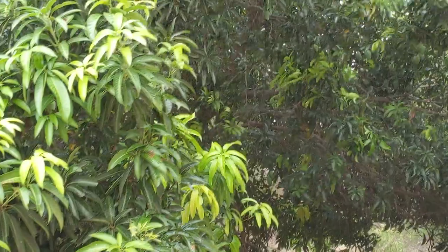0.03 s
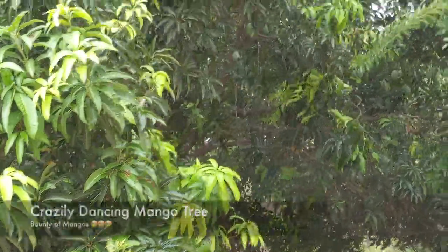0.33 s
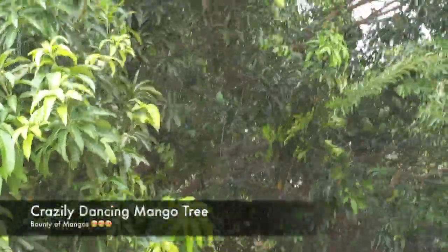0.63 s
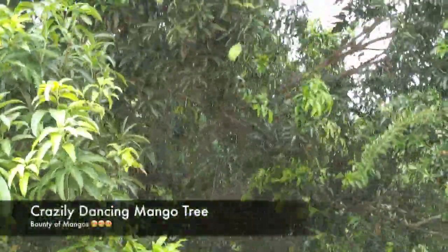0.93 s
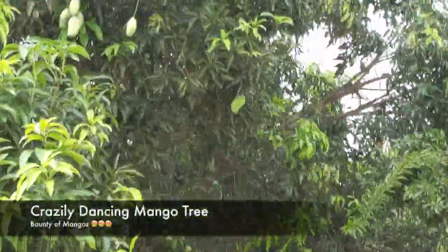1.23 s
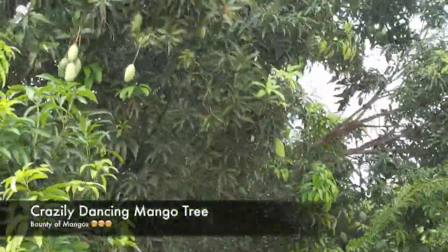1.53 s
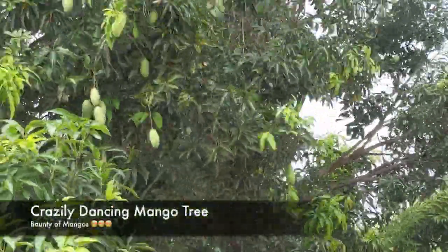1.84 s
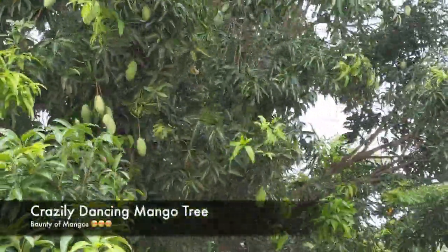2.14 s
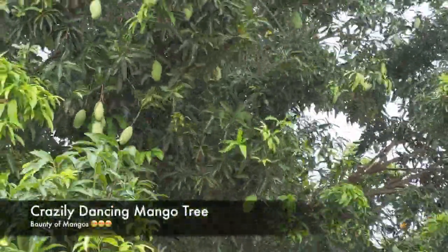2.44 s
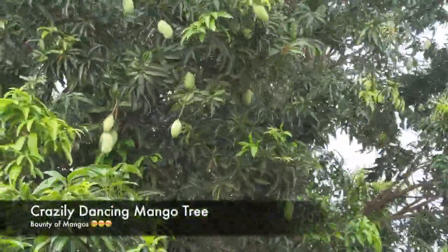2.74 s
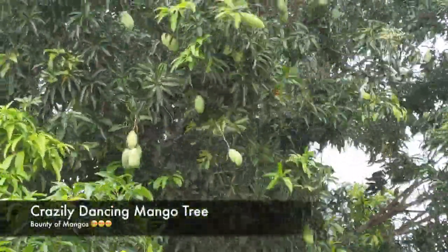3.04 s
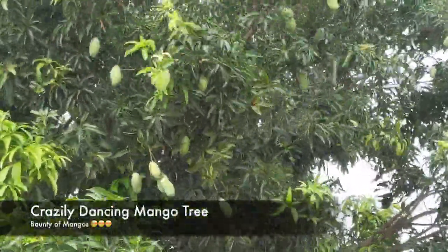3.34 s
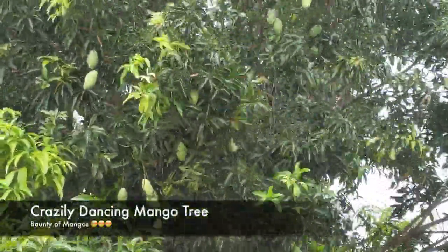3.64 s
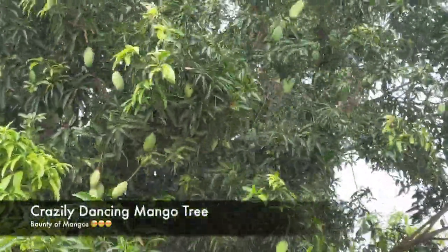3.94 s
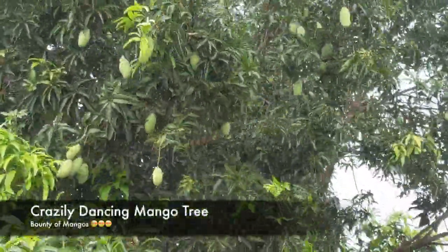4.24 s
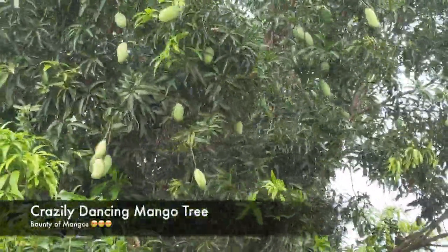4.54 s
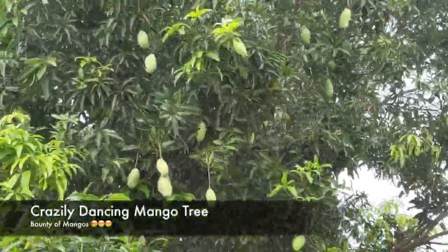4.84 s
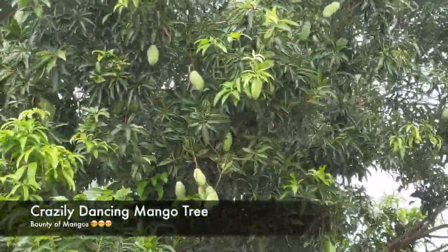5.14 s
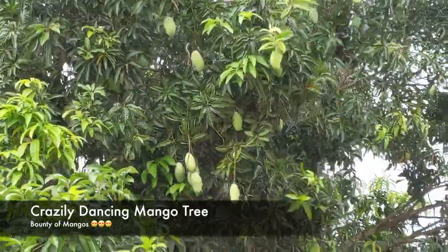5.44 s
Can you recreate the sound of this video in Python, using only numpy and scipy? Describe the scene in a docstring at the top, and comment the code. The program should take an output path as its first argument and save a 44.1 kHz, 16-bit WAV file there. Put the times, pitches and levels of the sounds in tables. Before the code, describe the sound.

Leaves hiss and patter as a gust builds, thumping and fluttering on the microphone after a few faint, far bird calls.

```python
"""Leaves hiss and patter, mostly to the left, as gusty wind tosses a big mango tree.
Eddies tumble over the two microphone ports: low rumble, fluttering buffet and single pops,
hardest in mid-gust. Before the gust a far bird calls twice, hoarsely; a small one peeps faintly."""
import sys
import numpy as np
from scipy import signal
from scipy.fft import rfft, irfft, next_fast_len
from scipy.io import wavfile
from scipy.ndimage import uniform_filter1d, map_coordinates

SR = 44100
rng = np.random.default_rng(int(sys.argv[2]) if len(sys.argv) > 2 else 0)


def log_audio(samples):
    """Write samples as a 16-bit WAV file to the path given in sys.argv[1]."""
    # one column per channel
    frames = np.atleast_2d(samples).T
    # limit to full scale, then quantise
    limited = np.clip(frames, -1, 1)
    pcm = np.round(limited * 32767).astype(np.int16)
    wavfile.write(sys.argv[1], SR, pcm)


N = 246959


def amp(db):
    """dB to gain."""
    return 10 ** (np.asarray(db) / 20)


def unit(x):
    """Scale to rms 1."""
    return x / np.sqrt(np.mean(x ** 2) + 1e-20)


def along(points, hz):
    """Interpolate (Hz, value) points on a log axis."""
    knots_hz, values = np.transpose(points)
    return np.interp(np.log(hz + 1), np.log(knots_hz), values)


def curve(points):
    """Interpolate (s, value) points to one value per sample."""
    knots_s, values = np.transpose(points)
    return np.interp(np.arange(N) / SR, knots_s, values)


def wobble(rate_hz):
    """Smooth random curve, rate_hz knots per second."""
    knots = rng.standard_normal(int(N * rate_hz / SR) + 4)
    return map_coordinates(knots, [np.arange(N) * rate_hz / SR])


def hump(middle_s, length_s):
    """Raised cosine, 0 to 1 and back."""
    u = np.clip((np.arange(N) / SR - middle_s) / length_s, -.5, .5)
    return np.cos(np.pi * u) ** 2


def filtered(x, response):
    """Apply a complex response, given as a function of Hz."""
    size = next_fast_len(N + SR // 2)
    return irfft(rfft(x, size) * response(np.fft.rfftfreq(size, 1 / SR)), size)[..., :N]


def scatter(starts, shapes):
    """Sum short shapes, one per row, from their start samples on."""
    at = np.maximum(starts.astype(int)[:, None] + np.arange(shapes.shape[1]), 0)
    return np.bincount(at.ravel(), shapes.ravel(), N)[:N]


def stereo(pair, spectrum, correlation):
    """Colour two independent signals and blend them to a left-right correlation."""
    def response(hz):
        angle = np.arccos(np.clip(along(correlation, hz), -1, 1)) / 2
        return amp(along(spectrum, hz)) * [np.cos(angle), np.sin(angle)]
    mid, side = filtered(pair, response)
    return unit(np.array([mid + side, mid - side]))


def leaf_hiss(patchy_db):
    """The far crown blurs to a hiss: two white noises, gain patchy in time and frequency."""
    spectra = signal.stft(rng.standard_normal((2, N)), nperseg=512)[2]
    patches = uniform_filter1d(rng.standard_normal(spectra.shape), size=10, axis=1)
    patches = unit(uniform_filter1d(patches, size=14, axis=2))
    hiss = signal.istft(spectra * amp(patchy_db * patches), nperseg=512)[1]
    return unit(hiss[:, :N])


def leaf_taps(count, tap_hz, spread_db):
    """Stiff leaves slap each other: one-cycle clicks, a few harder than the rest."""
    when, pitch, force = rng.random((count, 3)).T
    pitch_hz = tap_hz * 2 ** (1.5 * (pitch - .5))
    cycles = pitch_hz[:, None] * np.arange(64) / SR
    strength = amp(-spread_db * np.log(np.maximum(force, .02)))
    clicks = strength[:, None] * np.sin(2 * np.pi * cycles) * np.exp(-2 * cycles)
    return unit(scatter(when * N, clicks))


def leaves(tap_db=-10.5, rim_s=0.000524, rim_share=0.16, treble_db_per_db=0.2, gain_db=2):
    """Near leaves patter over the hiss of the crown; harder swaying sounds brighter."""
    # Crown sway. Each row: time in seconds, relative level in dB.
    sway = [(0.17, -42), (0.7, -39), (1.15, -39), (1.4, -39), (1.85, -37), (2.04, -36), (2.17, -37),
            (2.32, -37.5), (2.78, -37), (3.35, -37), (3.8, -35.5), (4.08, -36.5), (4.2, -37), (4.5, -37),
            (5.0, -38.5), (5.6, -39.0)]
    # Leaf spectrum. Each row: frequency in Hz, relative density in dB.
    spectrum = [(10, -36), (300, 1), (1000, 0), (1500, -2), (2100, -0.94), (2750, 3), (3300, 4),
                (3800, 1.9), (4400, 2.5), (4900, -0.1), (5650, 2), (6600, -2.5), (7400, -1.5), (8500, -3.5),
                (10100, -1), (10800, -18.5), (11400, -5), (12200, -3.5), (13200, -18)]
    # Left-right likeness. Each row: frequency in Hz, correlation.
    correlation = [(200, .7), (1250, .65), (1900, .25), (2250, -.1), (2900, .2), (3800, -.1), (5000, 0)]
    # Balance. Each row: frequency in Hz, left over right in dB.
    lean = [(500, 8.5), (1100, 4.5), (1500, 6), (2200, -1.5), (2800, 1), (4000, 5), (5600, 8.5),
            (9500, 7.5), (12500, 12)]
    sway_db = curve(sway)
    taps = np.array([leaf_taps(count=6000, tap_hz=5080, spread_db=0.5) for port in range(2)])
    rustle = stereo(leaf_hiss(patchy_db=0.96) + amp(tap_db) * taps, spectrum, correlation)
    # A reflection at the microphone's rim ripples the treble; the body shades the right port.
    rim = lambda hz: 1 + rim_share * np.clip(hz / 5000, 0, 1) * np.exp(-2j * np.pi * hz * rim_s)
    shade = lambda hz: amp(np.outer([.5, -.5], along(lean, hz)))
    rustle = unit(filtered(rustle, lambda hz: rim(hz) * shade(hz)))
    treble = filtered(rustle, lambda hz: hz ** 4 / (hz ** 4 + 6000 ** 4))
    treble_db = treble_db_per_db * (sway_db - np.mean(sway_db))
    rustle += treble * (amp(treble_db) - 1)
    return rustle * amp(sway_db + gain_db + 0.31 * wobble(18))


def puffs(attack_s=0.011, release_s=0.017, slack_db=2.5, slack_lead_s=0.013, slack_s=0.0081):
    """Lift in dB of buffet and rumble: each puff bursts out of slack air, holds and drops."""
    # Each row: start in seconds, length in seconds, buffet lift in dB, rumble lift in dB.
    bursts = [(0.234, 0.02, 6.5, 2), (0.317, 0.037, 3, 0), (0.433, 0.032, 4, 6), (0.51, 0.1, 4, -2.5),
              (0.881, 0.058, 0, 4.5), (0.988, 0.027, 7, 8.5), (1.11, 0.028, 5, 4), (1.18, 0.036, 4, 8),
              (1.253, 0.026, 3, 4), (1.401, 0.048, 11, 0), (1.488, 0.031, 5, 3), (1.645, 0.025, 9, 3),
              (1.708, 0.044, 8, 1.5), (1.779, 0.077, 4, 3), (2.017, 0.038, 6.5, 3), (2.205, 0.042, 3.5, 0),
              (2.292, 0.045, 4, 6), (2.372, 0.1, 7, 3.5), (2.543, 0.058, 0, 7.5), (2.654, 0.045, 2.5, -12),
              (2.74, 0.081, 1.5, -2), (2.992, 0.048, 3.5, 3), (3.112, 0.062, 1.5, -2), (3.21, 0.057, 2, 2),
              (3.287, 0.071, 4.5, -3), (3.402, 0.029, 4, 2), (3.554, 0.061, 7, -0.5),
              (3.638, 0.014, 7.5, -9), (3.677, 0.021, 4.5, 11), (3.814, 0.027, 6.5, 5),
              (3.882, 0.031, 2, 8), (3.942, 0.028, 4.5, 7), (4.002, 0.021, 6, -6), (4.03, 0.033, 5, -4),
              (4.191, 0.028, 2, 6), (4.265, 0.071, 3.5, -5), (4.512, 0.073, 2, -3.5),
              (4.66, 0.064, 1, -0.5), (4.928, 0.02, 2, 7), (5.036, 0.0095, 1, 6), (5.225, 0.12, 4.5, -3.5),
              (5.402, 0.041, 7, -2.5), (5.46, 0.028, 9.5, 1)]
    # Each row: middle in seconds, length in seconds, depth in dB (negative lifts).
    lulls = [(0.267, .03, 5), (0.305, .03, 3), (0.495, 0.037, 1), (0.952, 0.05, 1), (1.155, 0.033, 1),
             (1.328, 0.13, 4), (1.62, .05, 3), (1.89, 0.045, -1), (2.52, .06, 2.5), (2.81, 0.019, 4),
             (2.838, .025, -4), (2.89, 0.02, 5), (3.084, .03, 5), (3.199, .025, 8), (3.534, .025, 6),
             (3.701, 0.035, 6), (3.881, .025, 0), (3.932, .035, 4), (4.176, 0.023, 3), (4.484, 0.021, 7),
             (4.888, 0.043, 3), (5.21, 0.045, 6), (5.368, .04, 4)]
    t, lift_db = np.arange(N) / SR, np.zeros((2, N))
    for start_s, length_s, buffet_db, rumble_db in bursts:
        edges = np.minimum((t - start_s) / attack_s, (start_s + length_s - t) / release_s)
        lift_db += np.outer([buffet_db, rumble_db], np.clip(edges + .5, 0, 1))
        lift_db -= slack_db * hump(start_s - slack_lead_s, slack_s)
    for middle_s, length_s, depth_db in lulls:
        lift_db -= depth_db * hump(middle_s, length_s)
    return lift_db


def rumble(puff_db, gain_db=4, right_db=-1.3):
    """Large slow swirls press on both ports nearly together, a little harder on the left."""
    # Swirl spectrum. Each row: frequency in Hz, relative density in dB.
    spectrum = [(4, -44), (14, -10), (25, -2), (60, -1.5), (105, -4), (170, -8.5), (300, -16), (700, -41),
                (2000, -100)]
    # Swirl strength. Each row: time in seconds, relative level in dB.
    strength = [(0.17, -41.5), (0.42, -40), (0.58, -30.5), (0.78, -37.5), (0.85, -39), (1.35, -40),
                (1.75, -37.5), (1.95, -38), (2.3, -38.5), (2.7, -28), (3.4, -28.5), (3.75, -29.5),
                (3.95, -29.5), (4.8, -32.5), (5.1, -33), (5.45, -30), (5.6, -34.5)]
    swirl = stereo(rng.standard_normal((2, N)), spectrum, correlation=[(30, .6), (70, .5), (150, .2)])
    level_db = curve(strength) + puff_db + gain_db + [[0], [right_db]]
    return amp(level_db) * unit(swirl * amp(0.54 * wobble(14)))


def eddy_shapes(pitch_hz, skew):
    """Pressure of passing vortices, one per row: a push either side of the core's suction."""
    u = 2 * np.pi * pitch_hz[:, None] * np.arange(-640, 640) / SR
    return (u * u - 1 - skew * u) * np.exp(-u * u / 2)


def eddies(count, spread_octaves, spread_db, db_per_octave):
    """Steady stream of vortices of mixed size and strength on one port."""
    # How fast a typical eddy passes. Each row: time in seconds, pitch in Hz.
    pace = [(0.35, 198), (0.65, 148), (1.9, 116), (2.4, 152), (2.9, 177), (3.6, 192), (4.3, 164),
            (5.6, 149)]
    jitter, pitch, force = rng.uniform(-0.89, 1, (count, 3)).T
    starts = np.clip((np.arange(count) + jitter) * N / count, 0, N - 1).astype(int)
    pace_hz = curve(pace)[starts]
    octaves = spread_octaves * pitch
    strength = amp(spread_db * force + db_per_octave * octaves) * np.sqrt(pace_hz)
    pulses = eddy_shapes(pace_hz * 2 ** octaves, skew=0.86)
    return unit(scatter(starts, strength[:, None] * pulses))


def both_ports(ports, leak_db=-5.5, corner_hz=160, delay_s=.00033):
    """The stereo pair feeds each port, high-passed, inverted and late, into the other channel."""
    # Port response. Each row: frequency in Hz, gain in dB.
    response = [(20, -29), (80, -6), (150, 0.1), (220, 5), (350, 4), (480, 3.5), (700, 0.26), (1000, 2.5),
                (1400, -2.5), (2500, -17), (6000, -60)]
    highpass = lambda hz: 1j * hz / (corner_hz + 1j * hz)
    leak = lambda hz: amp(leak_db) * highpass(hz) * np.exp(-2j * np.pi * hz * delay_s)
    crossed = ports - filtered(ports[::-1], leak)
    return filtered(crossed, lambda hz: amp(along(response, hz)))


def buffet(puff_db):
    """Eddies hit both ports in flurries, harder on the right, driven by the gust and its puffs."""
    # Wind at the ports between puffs. Each row: time in seconds, level in dB.
    wind = [(0.17, -31), (0.36, -28), (0.5, -35.5), (0.8, -31.5), (1.05, -43), (1.36, -44), (1.5, -31),
            (1.95, -36.5), (2.1, -26.5), (2.35, -25.5), (2.52, -24.5), (2.68, -19), (2.95, -17.5),
            (3.2, -19.5), (3.35, -20.5), (3.5, -22), (3.73, -25), (3.85, -20.5), (4.12, -26.5),
            (4.7, -22.5), (4.9, -24), (5.25, -26.5), (5.6, -30)]
    ports = np.array([eddies(count=2100, spread_octaves=1.28, spread_db=6.0, db_per_octave=-1.0)
                      for port in range(2)])
    flutter = both_ports(ports * amp([[-1.2], [1.2]]))
    flurries = amp(1.3 * wobble(45))
    return amp(curve(wind) + puff_db) * unit(flutter * flurries)


def thumps(left_lag_s=.0005):
    """The hardest vortices pop on the right port, then the left; higher pitch, sharper slap."""
    # Each row: time in seconds, relative level in dB, pitch in Hz.
    hard_eddies = [(0.254, -17.5, 540), (0.338, -19, 330), (0.453, -21, 420), (0.526, -22, 359),
                   (0.819, -25.5, 246), (1.012, -26.5, 238), (1.21, -27, 241), (1.407, -26, 261),
                   (1.42, -22.5, 260), (1.432, -27, 292), (1.575, -32, 257), (1.645, -23, 224),
                   (1.786, -26.5, 251), (1.848, -29, 242), (2.318, -19, 400), (2.383, -23, 304),
                   (2.416, -17, 311), (2.461, -12, 234), (2.586, -15, 213), (2.643, -18, 322),
                   (2.718, -14.5, 276), (2.77, -12, 290), (2.821, -13, 500), (2.855, -12, 485),
                   (2.91, -13, 473), (2.968, -15.5, 326), (3.028, -12, 266), (3.06, -17, 302),
                   (3.176, -11, 341), (3.255, -12, 330), (3.287, -13, 334), (3.318, -13, 291),
                   (3.326, -13.5, 520), (3.352, -14.5, 282), (3.374, -10.5, 210), (3.431, -9.5, 440),
                   (3.463, -12.5, 299), (3.521, -14, 695), (3.544, -13, 400), (3.56, -18, 500),
                   (3.597, -14.5, 620), (3.605, -13, 350), (3.644, -19, 319), (3.686, -21, 400),
                   (3.767, -15.5, 309), (3.828, -12.5, 300), (3.841, -14.5, 330), (3.86, -11, 288),
                   (3.885, -11.5, 420), (3.912, -16, 400), (3.943, -12, 380), (3.972, -15, 328),
                   (4.007, -18, 305), (4.048, -22, 265), (4.073, -13, 480), (4.16, -19, 280),
                   (4.204, -19, 352), (4.238, -16.5, 260), (4.287, -14.5, 330), (4.313, -16.5, 360),
                   (4.38, -19, 330), (4.526, -18, 257), (4.657, -16.5, 280), (4.679, -20, 330),
                   (4.711, -16, 380), (4.787, -18, 324), (4.934, -11, 323), (5.035, -17.5, 232),
                   (5.076, -11.5, 423), (5.14, -22.5, 300), (5.232, -18, 435), (5.243, -23, 490),
                   (5.43, -13.5, 298), (5.473, -14.5, 326), (5.567, -20, 298)]
    # Broad swirl, then tight core. Each row: multiple of the pitch, gain in dB.
    vortex = [(0.55, -2), (1.15, -4.5)]
    time_s, level_db, pitch_hz = np.transpose(hard_eddies)
    pops = sum(amp(level_db + part_db)[:, None] * eddy_shapes(ratio * pitch_hz, skew=0.49)
               for ratio, part_db in vortex)
    right_starts = (time_s + .002) * SR - pops.shape[1] / 2
    left_starts = right_starts + left_lag_s * SR
    return both_ports(np.array([scatter(left_starts, pops), scatter(right_starts, pops)]))


def hoarse_bird(arch=.06, rasp_hz=120, rasp_depth=.65):
    """Far harsh calls: shaky, arched, rattling notes; the third harmonic meets the throat resonance."""
    # Each row: start in seconds, length in seconds, pitch in Hz, relative level in dB,
    # hoarseness as a share of the pitch.
    calls = [(0.425, 0.31, 626, -44.5, .05), (1.6, 0.19, 637, -44.5, .035)]
    # Throat response. Each row: frequency in Hz, gain in dB.
    throat = [(500, -14), (1250, -9), (1500, -4), (1850, 0), (2100, -6), (2600, -15), (4000, -30)]
    t, voice = np.arange(N) / SR, np.zeros(N)
    for start_s, length_s, pitch_hz, level_db, hoarseness in calls:
        progress = np.clip((t - start_s) / length_s, 0, 1)
        swell = np.sqrt(np.abs(np.sin(np.pi * progress)))
        bend = 1 + arch * (swell - 1) + hoarseness * wobble(330)
        phase = 2 * np.pi * np.cumsum(pitch_hz * bend) / SR
        voice += amp(level_db) * swell * sum(np.sin(k * phase) for k in range(1, 6))
    rasp = np.sin(2 * np.pi * np.cumsum(rasp_hz * (1 + .3 * wobble(60))) / SR)
    return filtered(voice * unit(1 + rasp_depth * rasp), lambda hz: amp(along(throat, hz)))


def small_bird():
    """Faint peeps: short, slightly unsteady sine notes."""
    # Each row: middle in seconds, length in seconds, pitch in Hz, level in dB.
    peeps = [(0.95, .08, 3370, -46), (1.14, .07, 3370, -45.5), (1.38, .08, 3320, -49),
             (1.53, .09, 3290, -49)]
    voice = np.zeros(N)
    for middle_s, length_s, pitch_hz, level_db in peeps:
        phase = 2 * np.pi * np.cumsum(pitch_hz * (1 + .012 * wobble(150))) / SR
        voice += amp(level_db) * hump(middle_s, length_s) * np.sin(phase)
    return voice


def grove(x, t60_s):
    """Trunks and foliage scatter a far sound differently to each side."""
    t = np.arange(SR // 2) / SR
    tail = rng.standard_normal((2, len(t))) * amp(-60 * t / t60_s)
    return signal.fftconvolve(x[None], tail / np.linalg.norm(tail[0]), axes=1)[:, :N]


def scene():
    """Tree, wind on the microphone and birds."""
    buffet_lift_db, rumble_lift_db = puffs()
    calls = hoarse_bird() + small_bird()
    birds = calls + amp(-11) * grove(calls, t60_s=.25)
    return leaves() + rumble(rumble_lift_db) + buffet(buffet_lift_db) + thumps() + birds


def record(dry):
    """The microphone rounds off the hardest blows, switches on abruptly and limits the band."""
    ceiling, on_s, ramp_s, top_hz = .75, 0.17, .003, 13300
    rounded = dry / (1 + (dry / ceiling) ** 6) ** (1 / 6)
    gate = np.clip((np.arange(N) / SR - on_s) / ramp_s, 0, 1)
    return filtered(rounded * gate, lambda hz: hz < top_hz)


dry = scene()
out = record(dry)
log_audio(out)
```